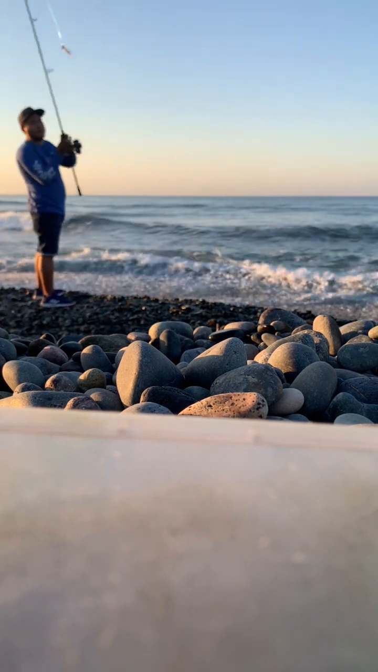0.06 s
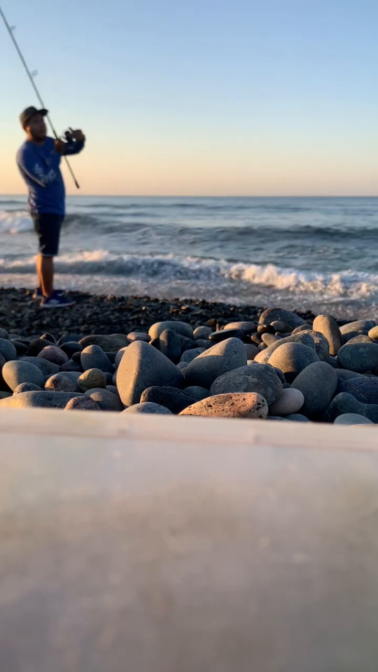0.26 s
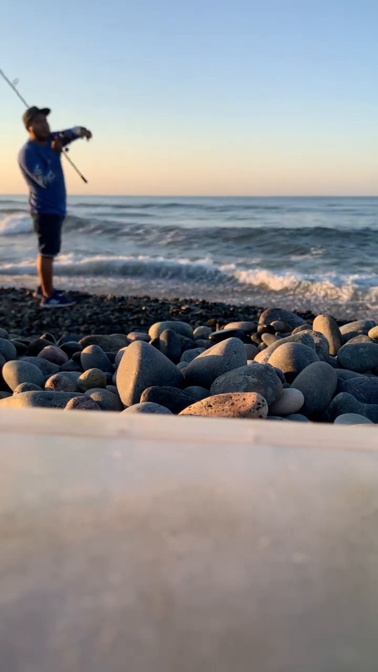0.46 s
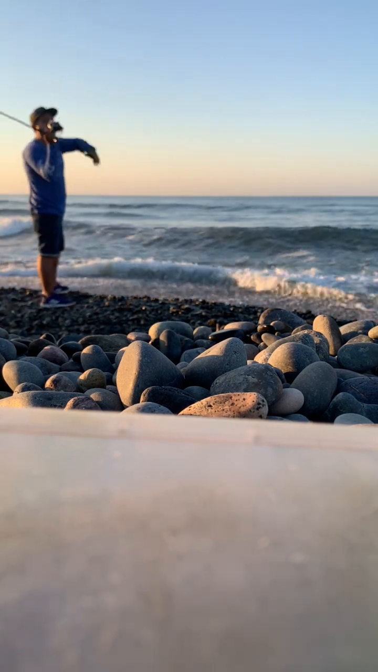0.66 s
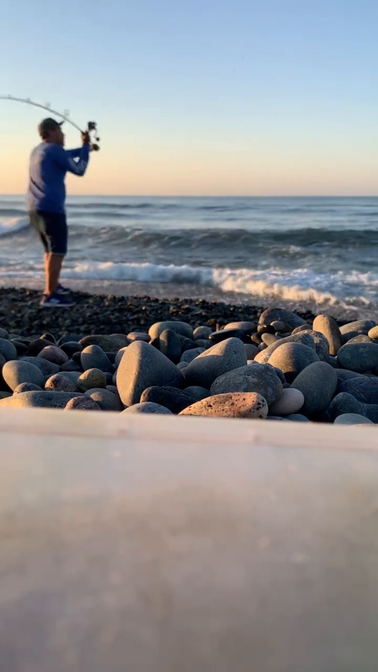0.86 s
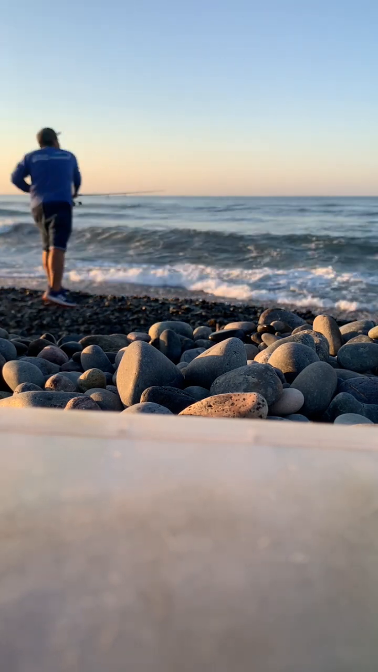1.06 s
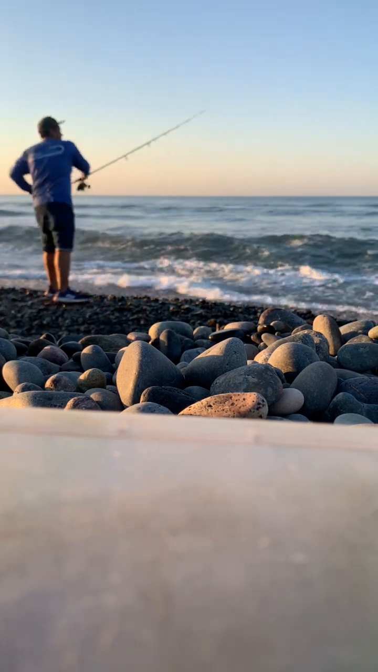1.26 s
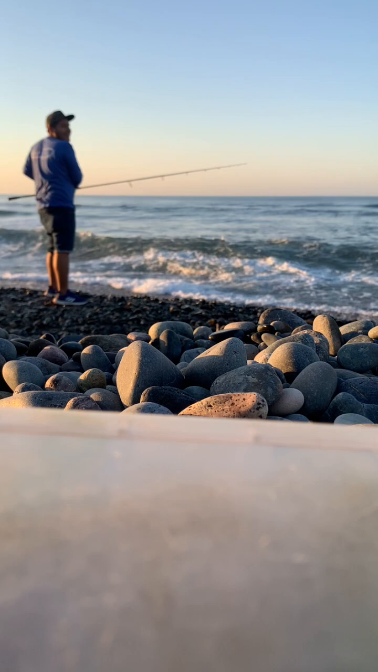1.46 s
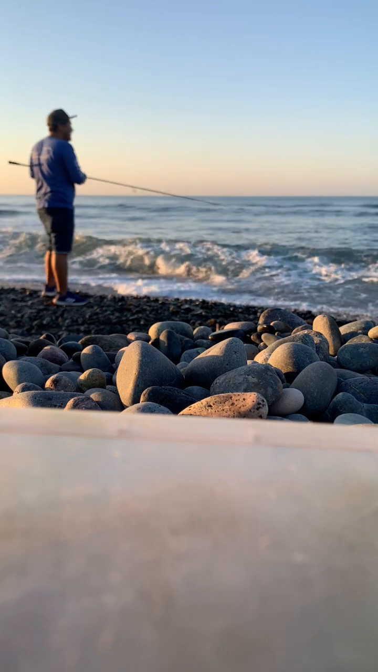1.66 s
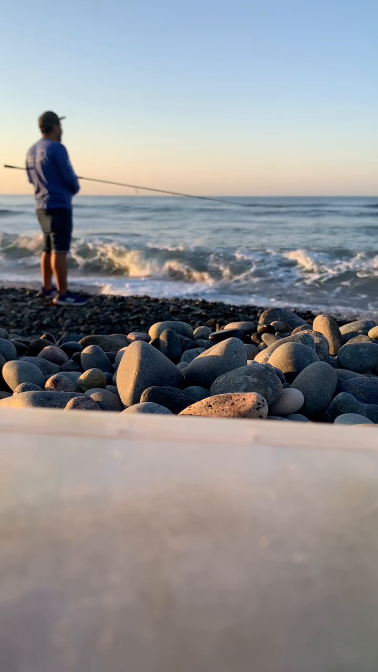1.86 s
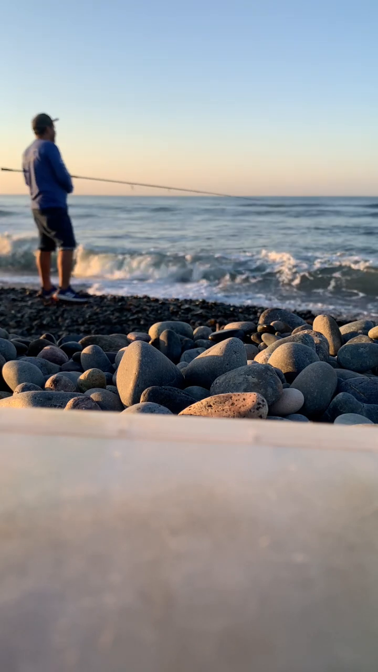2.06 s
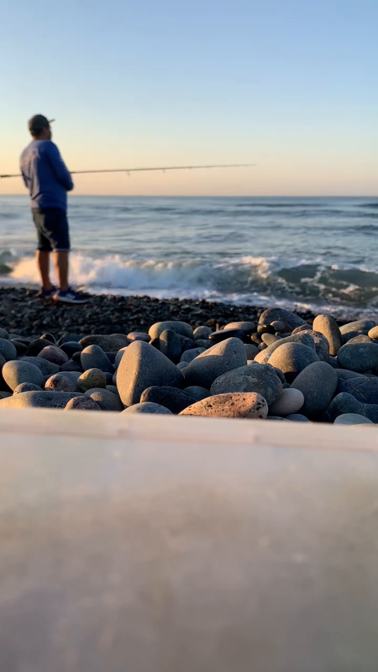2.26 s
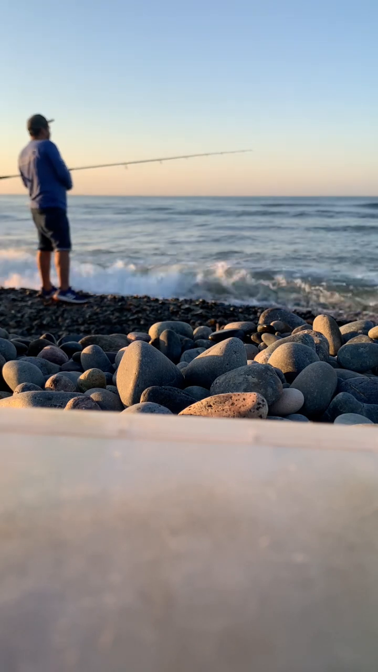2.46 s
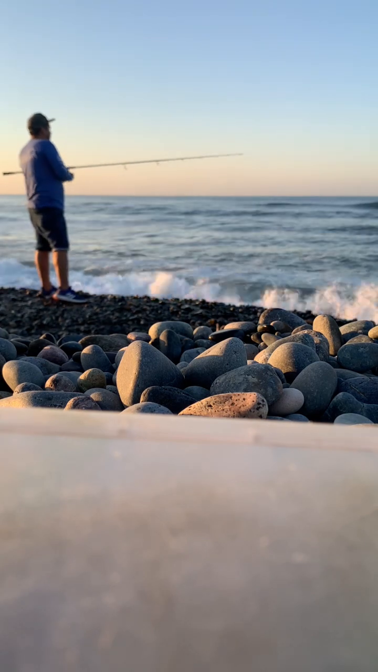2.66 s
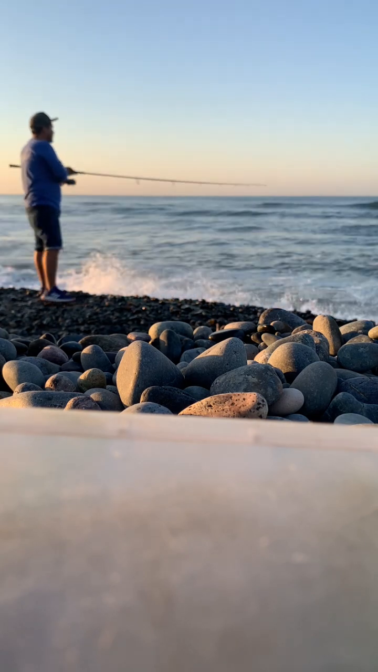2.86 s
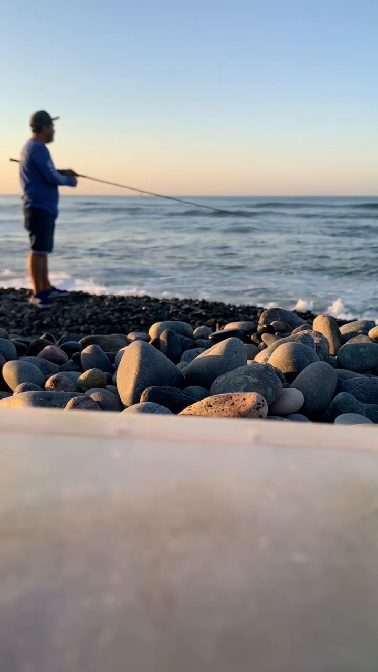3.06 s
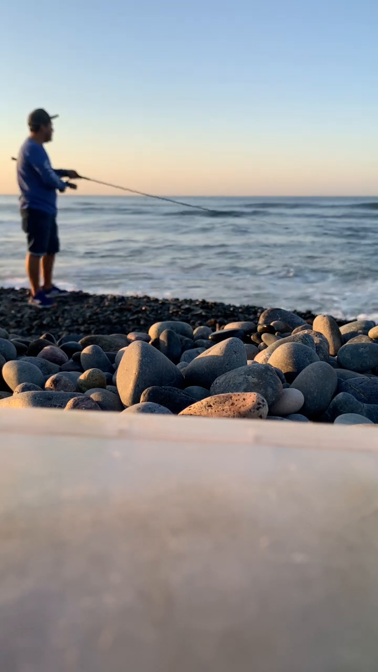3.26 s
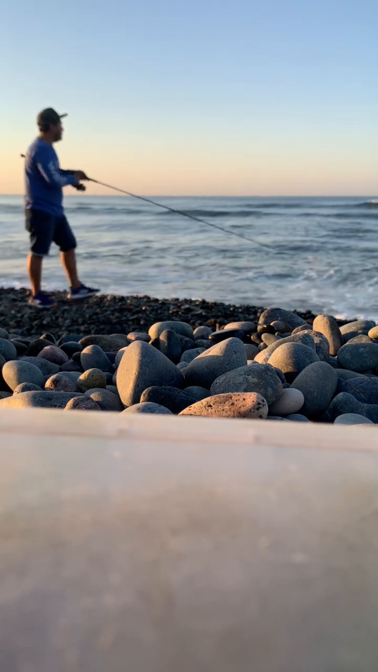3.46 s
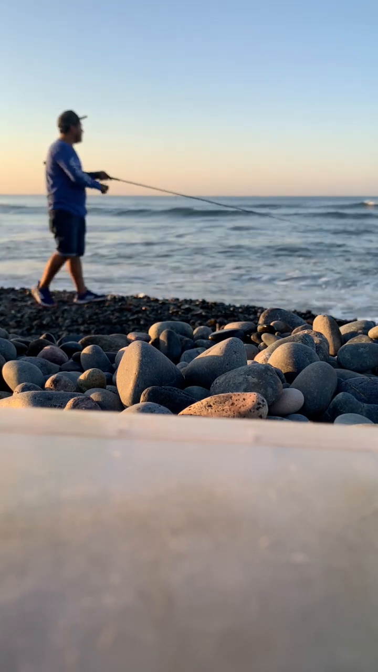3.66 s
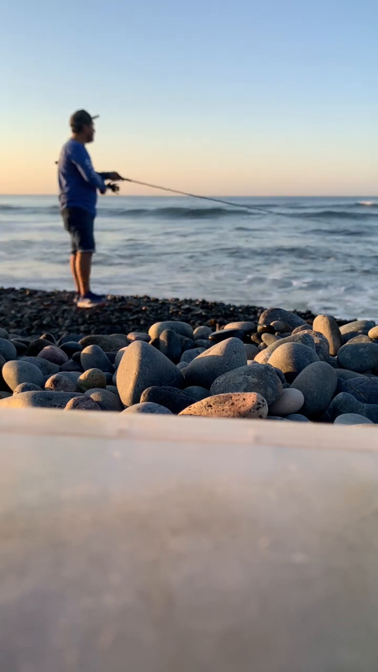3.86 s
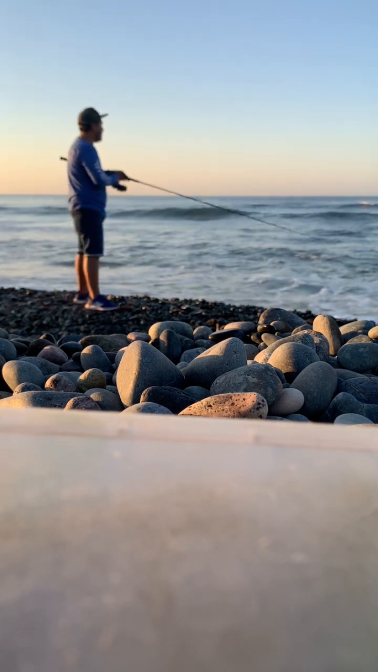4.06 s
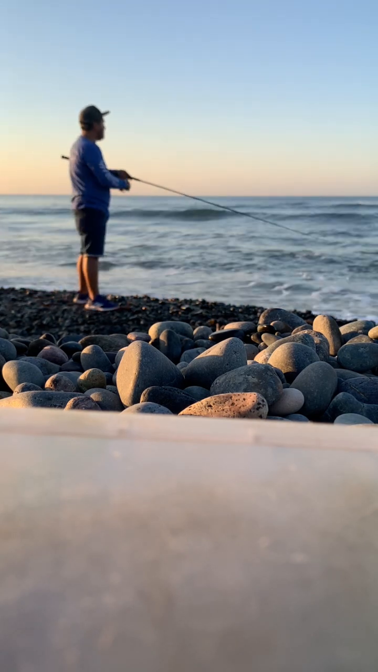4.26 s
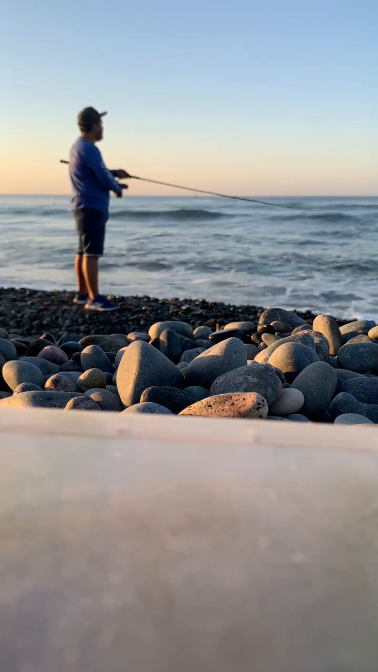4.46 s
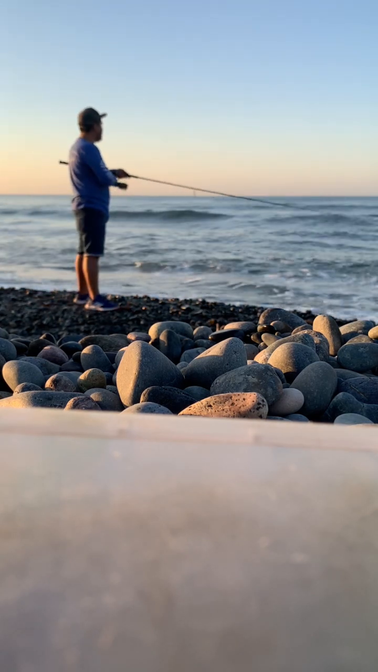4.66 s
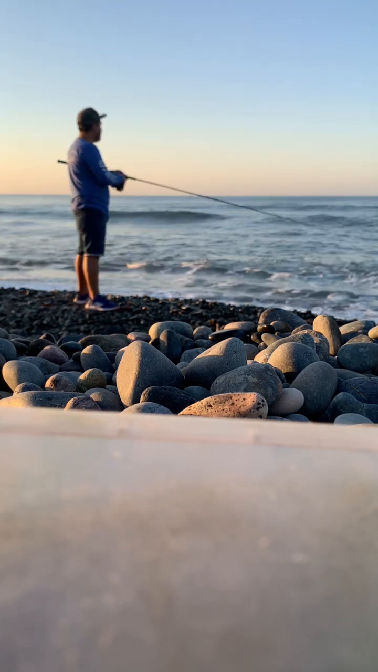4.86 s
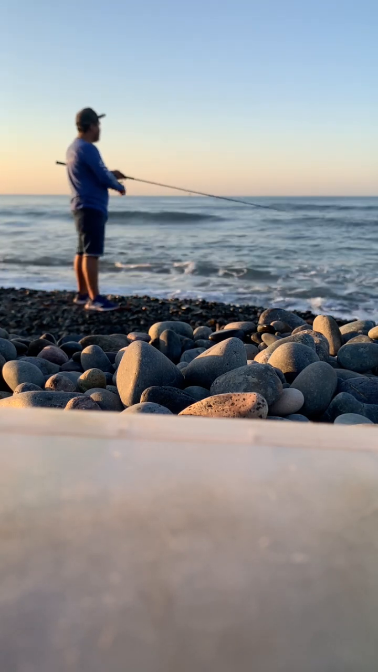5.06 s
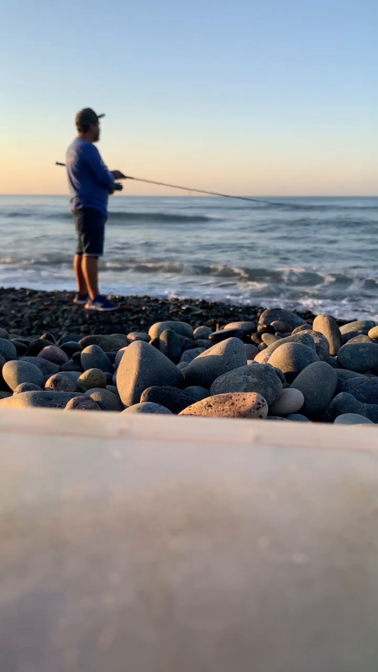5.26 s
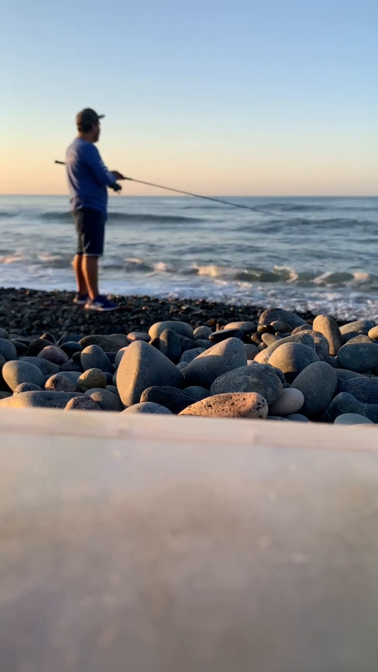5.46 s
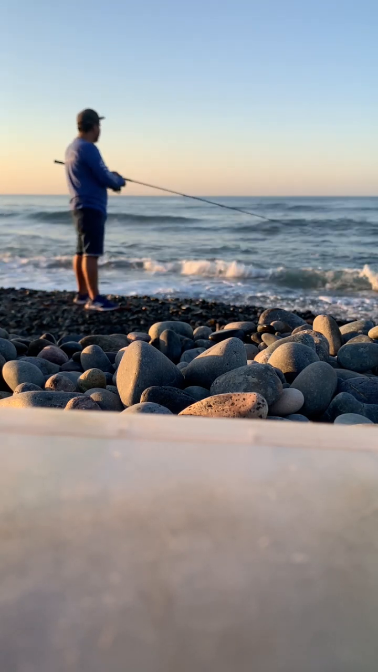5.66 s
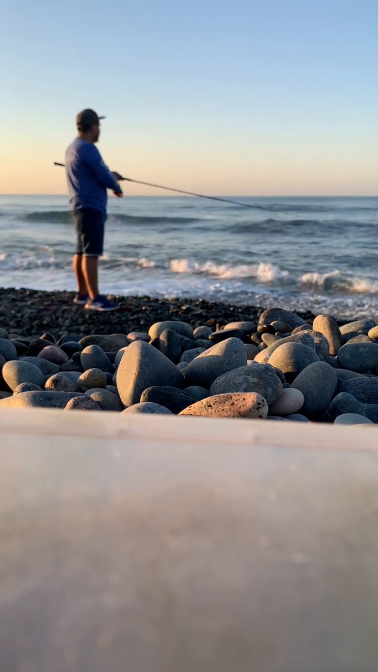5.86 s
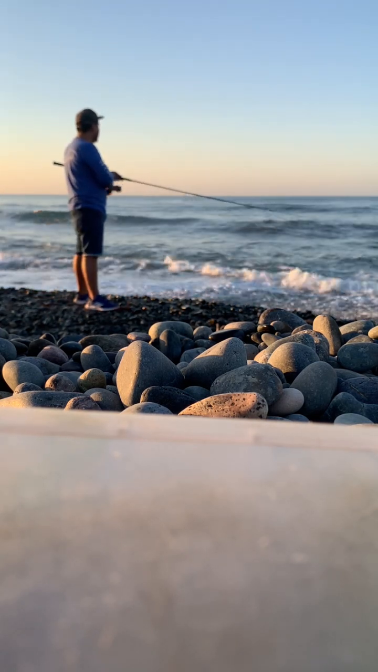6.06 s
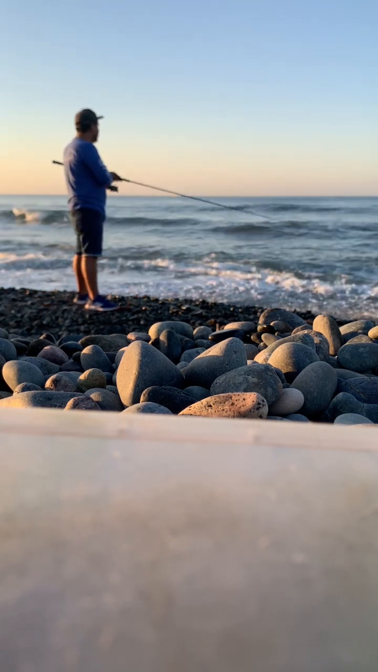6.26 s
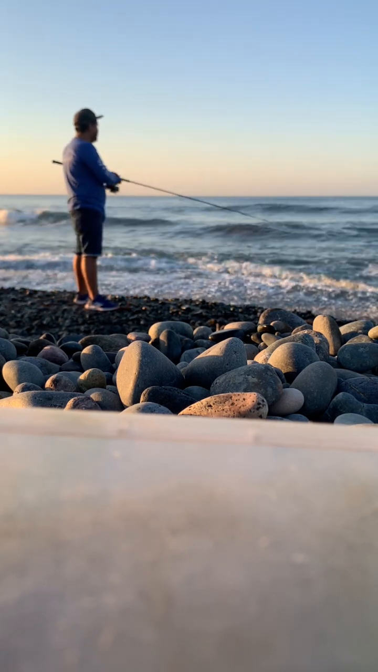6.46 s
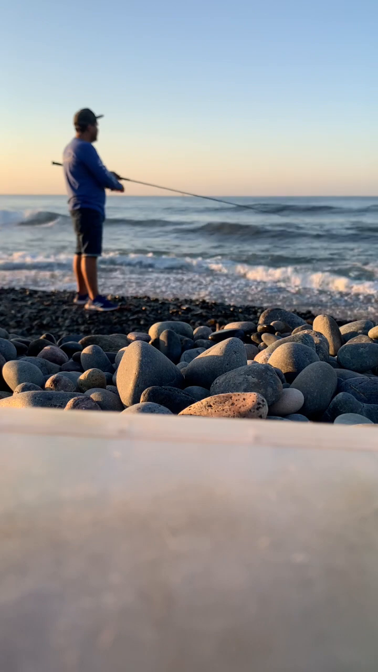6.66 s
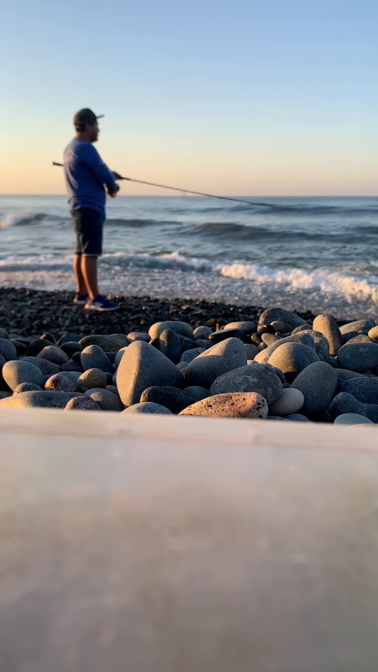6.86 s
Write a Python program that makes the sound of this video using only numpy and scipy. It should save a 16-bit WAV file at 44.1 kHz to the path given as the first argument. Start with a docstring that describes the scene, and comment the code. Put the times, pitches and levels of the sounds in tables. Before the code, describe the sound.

Ocean waves boom and fizz over a cobble beach, rattling stones, while a fishing rod whistles once and pebbles click.

```python
"""Breakers boom and roar on a cobble beach, foam fizzes up the shore and spray hisses. The surf is
countless bursting bubbles over the boom of trapped air; the running water rattles small stones and
knocks cobbles together. A few metres off, an angler whips a whistling rod through the air, tackle
ticks and pebbles click under shifting feet. All is heard by a phone lying on the stones."""
import sys
import numpy as np
from scipy import signal
from scipy.fft import rfft, irfft, next_fast_len
from scipy.io import wavfile
from scipy.ndimage import uniform_filter1d

SR = 44100
rng = np.random.default_rng(int(sys.argv[2]) if len(sys.argv) > 2 else 0)


def digitize_waveform(pressure):
    """Quantize a signal to 16-bit integers and store it at the path in sys.argv[1].

    Rows of a 2-D input are taken as channels; values are limited to [-1, 1].
    """
    field = np.atleast_2d(pressure).T
    bounded = np.clip(field, -1, 1)
    quanta = np.round(bounded * 32767).astype(np.int16)
    wavfile.write(sys.argv[1], SR, quanta)


N = 304731
FFT_SIZE = next_fast_len(N + SR // 4)
HZ = np.arange(FFT_SIZE // 2 + 1) * SR / FFT_SIZE
T = np.arange(N) / SR
CONTROL_T = T[::64]  # coarse time grid for envelopes

# how hard the waves are breaking: (time [s], boom [dB], extra roar [dB])
BREAKING = [(0, -26.5, 2.5), (.45, -25, -1.5), (1.05, -29, 0), (1.3, -31.5, -1), (1.8, -30, 2.5),
            (2.05, -21, 2), (2.3, -22.5, 1), (2.5, -22.5, 2.1), (2.8, -20.5, 1), (2.94, -21.5, -0.5),
            (3.0, -30, -1.3), (3.3, -36, 0), (3.75, -38.5, -1.5), (4.5, -36, -2), (5.2, -35.5, -0.5),
            (5.7, -31, -0.5), (6.2, -32, -0.5), (6.55, -25.5, -0.5), (6.91, -27.5, 0.5)]
# foam running up over the stones: (time [s], fizz [dB], spray [dB])
RUN_UP = [(0, -25.5, -39), (.94, -29, -40), (1.58, -33.5, -44.5), (2.25, -35.5, -45), (2.45, -33, -44),
          (2.58, -29.5, -44), (2.68, -29, -42), (2.76, -31.5, -43.5), (2.95, -35.5, -46), (3.37, -41, -64),
          (3.8, -46, -61), (4.35, -34, -75), (4.6, -31, -58), (5.04, -27, -50.5), (5.75, -24.5, -43.5),
          (6.3, -25.5, -44.5), (6.91, -26.5, -40)]


def surf(slosh_db=-0.6, flicker_db=1.4, lumps_db=0.4):
    """Two stretches of shore: bursting bubbles in third-octave bands, fed by six layers of water."""
    # layer spectra: (frequency [Hz], relative level [dB])
    boom = [(25, -64), (40, -48), (60, -33), (80, -7.5), (120, 5), (200, 6.5), (350, 2.5), (700, -33.5)]  # air trapped under a breaker
    roar = [(120, -32), (300, 0), (500, 1), (800, 2), (1100, -8.5), (2200, -17), (8000, -60)]  # breaking, tumbling water
    wash = [(500, -28), (1000, 4), (1500, 7), (1900, 1), (2600, -13), (5000, -46.5)]  # water running among the stones
    foam = [(1000, -38), (2000, -1.5), (2500, -1.5), (3200, -0.5), (4200, -6.5), (5200, -15.5),
            (7000, -13.5), (16000, -42.5)]  # fizz of the run-up
    spray = [(2000, -19), (5000, -5.5), (9000, -3.5), (16000, -10)]  # hiss on top
    far_surf = [(40, -30), (70, -11.5), (110, 5), (180, 2), (350, 1), (700, -49)]  # waves along the rest of the shore
    spectra = (boom, roar, wash, foam, spray, far_surf)
    core_hz = [(70, 250), (350, 900), (1200, 1900), (2400, 4500), (11000, 15000), (70, 250)]
    trims_db = [unit_power_db(spectrum, *core) for spectrum, core in zip(spectra, core_hz)]
    layers = list(zip(water_powers(), spectra, trims_db))
    # countless small bursts of uneven size merge into a slightly grainy rush
    sizes = undb(2.5 * np.repeat(rng.standard_normal((2, N // 8 + 1)), 8, axis=1)[:, :N])
    bubbles = rng.standard_normal((2, N)) * sizes
    bubble_spectrum = rfft(bubbles / bubbles.std(), FFT_SIZE) * FFT_SIZE / np.sqrt(2)
    out, slosh, octaves = 0, wander(4.7), np.log2(np.maximum(HZ, 1))
    for hz in 25 * 2 ** (np.arange(29) / 3):
        band = np.cos(np.pi / 2 * np.clip(3 * (octaves - np.log2(hz)), -1, 1))
        power = sum(p * undb(level_at(spectrum, hz) + trim) ** 2 for p, spectrum, trim in layers)
        drift_db = slosh_db * min(hz / 6000, 1) * slosh  # near splashes move the treble together
        drift_db += flicker_db * min(1400 / hz, 1) * wander(16)
        drift_db += lumps_db * min(1200 / hz, 1) * wander(3.585)
        envelope = audio_rate(np.sqrt(power / FFT_SIZE) * undb(drift_db))
        out = out + envelope * irfft(bubble_spectrum * band, FFT_SIZE)[:, :N]
    return out


def water_powers(roar_sends_db=(-0.097, 0, -2.36), wash_sends_db=(-12, -10, -4), far_db=-40.5):
    """Power envelopes of boom, roar, wash, foam, spray and the steady far surf."""
    boom, roar_boost = power_curves(BREAKING)
    fizz, spray = power_curves(RUN_UP)
    feeds = np.array([boom, afterwash(), fizz])  # in the order of the sends
    roar = undb(roar_sends_db) ** 2 @ feeds
    wash = undb(wash_sends_db) ** 2 @ feeds
    return boom, roar * roar_boost, wash, fizz, spray, np.full_like(boom, undb(far_db) ** 2)


def afterwash(decay_db_per_s=17):
    """Power of broken water tumbling on after the crest falls: the boom, lagging and fading slowly."""
    feedback = undb(-decay_db_per_s * CONTROL_T[1]) ** 2
    power = power_curves(BREAKING)[0]
    for _ in range(2):
        power, _ = signal.lfilter([1 - feedback], [1, -feedback], power, zi=[feedback * power[0]])
    return power


def crest_thumps(hz=111.5, width_hz=46, attack_s=0.026, release_s=0.13):
    """A crest slams down on the shore: deep rumble that swells fast and dies away."""
    # crest impacts: (time [s], level [dB])
    slams = [(2.47, -23), (2.67, -23.5), (6.3, -25), (6.55, -23)]
    envelope = np.zeros(N)
    for time, db in slams:
        span, shape = swell(time - attack_s, time, time + release_s)
        envelope[span] += undb(db) * shape
    return envelope * noise_band(hz, width_hz)


def air_pockets(flutter_db=1.5):
    """Air pockets resound hollowly in the collapsed wave and outlast the boom."""
    # pocket resonances: (centre [Hz], width [Hz], level re afterwash [dB])
    pockets = [(830, 390, -5.5), (1330, 110, -9.5)]
    resonance = sum(undb(db + flutter_db * audio_rate(wander(12))) * noise_band(hz, width)
                    for hz, width, db in pockets)
    return audio_rate(np.sqrt(afterwash())) * resonance


def stone_rattle(knocks_per_s=260, hz=1720, t60_s=0.018, cluster_db=3.0, spread_octaves=0.31):
    """Small stones rolled by the running water knock in clusters, riding the level of the fizz."""
    out, t = np.zeros(N + SR), np.arange(SR // 40) / SR
    fizz = np.sqrt(power_curves(RUN_UP)[0])
    envelope = fizz * undb(1.5 + cluster_db * wander(9))
    count = int(knocks_per_s * T[-1])
    times = rng.uniform(0, T[-1], count)
    accents_db = np.minimum(3.5 * rng.exponential(size=count), 11)
    octaves = spread_octaves * (np.abs(rng.standard_normal(count)) - .3)
    gains = np.interp(times, CONTROL_T, envelope) * undb(accents_db)
    for time, pitch, gain in zip(times, hz * 2 ** octaves, gains):
        start = int(time * SR)
        out[start:start + len(t)] += gain * ring(t, pitch, t60_s)
    return out[:N]


def cobble_knocks(detune=0.044, scatter_db=2, contact_s=0.00091):
    """The backwash knocks big stones together: dull rings, each stone a different size."""
    # cobble hits: (time [s], level [dB], brightness [dB per mode])
    hits = [(5.013, -17, 0), (5.133, -16, 0), (5.285, -15, 0), (5.521, -10, 4), (5.567, -12, -2),
            (5.911, -7, -1), (5.949, -9, 1), (6.298, -14, 1), (6.429, -13, 0), (6.58, -15, 0)]
    # resonances of a cobble: (frequency [Hz], t60 [s], level [dB])
    modes = [(720, .018, -3), (1050, .012, -7), (1700, .012, -7), (2700, .007, -11)]
    out, t = np.zeros(N), np.arange(SR // 20) / SR
    attack = np.minimum(t / contact_s, 1)
    for time, db, bright_db in hits:
        start = int(time * SR)
        pitch_jitter, level_jitter = rng.standard_normal((2, len(modes)))
        for k, (hz, t60, mode_db) in enumerate(modes):
            gain = undb(db + mode_db + bright_db * k + scatter_db * level_jitter[k])
            out[start:start + len(t)] += gain * attack * ring(t, hz * (1 + detune * pitch_jitter[k]), t60)
    return out


def rod_cast(wobble=0.012):
    """The whipped rod sheds vortices whose pitch follows its speed; the thin line swishes."""
    # vortex tones: (start [s], peak [s], end [s], start [Hz], peak [Hz], end [Hz], level [dB])
    whistles = [(.72, .744, .764, 1380, 1540, 1900, -10.5), (.746, .767, .784, 1230, 1470, 1600, -5),
                (.785, .803, .832, 1550, 1410, 1150, -7.5), (.74, .762, .773, 1850, 2360, 2520, -13),
                (.795, .81, .826, 2360, 2265, 2090, -16), (.766, .775, .784, 1070, 1010, 960, -14)]
    # line cutting the air: (time [s], level [dB])
    swish_curve = [(.70, -69), (.725, -40), (.765, -36), (.78, -52), (.80, -42), (.83, -70)]
    # colour of the swish: (centre [Hz], width [Hz], gain [dB])
    swish_bands = [(5230, 410, 7), (6800, 710, 10.5), (8200, 1000, 9.5)]
    out, unsteady = np.zeros(N), audio_rate(wander(200))
    for start, peak, end, *glide_hz, db in whistles:
        span, shape = swell(start, peak, end)
        pitch = np.interp(T[span], [start, peak, end], glide_hz) * (1 + wobble * unsteady[span])
        out[span] += undb(db) * shape * np.sin(2 * np.pi * np.cumsum(pitch) / SR)
    swish = sum(undb(db) * noise_band(hz, width) for hz, width, db in swish_bands)
    times, swish_db = np.transpose(swish_curve)
    return out + swish * undb(np.interp(T, times, swish_db, -120, -120))


def clicks(detune=0.02, scatter_db=1, contact_s=0.0003, register_db=(0, -7, -13)):
    """Pebbles and tackle tick: the same brief modes, pitched a little differently on every hit."""
    # pebble and tackle hits: (time [s], level [dB], extra body [dB per register step])
    hits = [(.9955, -24, 11), (1.001, -18, 7), (2.2974, -.5, -4), (2.3624, -23, 10), (3.0084, -33, 0),
            (3.314, -26, 0), (3.66, -43, 17), (3.675, -19, 0), (3.672, -46, 16), (3.683, -16, 3),
            (3.6954, -26, 6), (3.7064, -33, 4), (4.333, -33, 0), (4.4647, -16, 0), (4.4687, -20, 0),
            (4.4937, -24, 0), (5.2734, -15, 0), (5.3009, -24, 0), (6.298, -10.5, 0)]
    # resonances of small hard things: (frequency [Hz], t60 [s], register [0 high, 1 middle, 2 low])
    modes = [(15200, .003, 0), (13600, .0035, 0), (11600, .003, 0), (9800, .004, 1), (7600, .006, 1),
             (5800, .004, 1), (4550, .01, 2), (2300, .006, 2)]
    out, t = np.zeros(N), np.arange(SR // 40) / SR
    attack = np.minimum(t / contact_s, 1)
    for time, db, body_db in hits:
        start = int(time * SR)
        pitch_jitter, level_jitter = rng.standard_normal((2, len(modes)))
        for k, (hz, t60, register) in enumerate(modes):
            gain = undb(db + register_db[register] + body_db * register + scatter_db * level_jitter[k])
            pitch = hz * (1 + detune * pitch_jitter[k])
            out[start:start + len(t)] += gain * attack * ring(t, pitch, t60)
    return out


def scrapes(hz=8200, width_hz=12000, roughness_db=2):
    """Line zips out and soles grind on grit: short uneven bursts of broad hiss."""
    # zips and scuffs: (start [s], peak [s], end [s], level [dB])
    strokes = [(0.986, 0.997, 1.022, -20), (2.365, 2.385, 2.42, -27), (3.572, 3.572, 3.61, -39),
               (3.65, 3.68, 3.69, -34), (4.043, 4.048, 4.09, -40), (4.14, 4.15, 4.165, -44),
               (4.323, 4.335, 4.345, -40), (4.451, 4.468, 4.485, -37)]
    out = np.zeros(N)
    for start, peak, end, db in strokes:
        span, shape = swell(start, peak, end)
        noise = rng.standard_normal(SR // 10)[:len(span)]
        bins_hz = np.fft.rfftfreq(len(span), 1 / SR)
        grit = irfft(rfft(noise) * bell(bins_hz, hz, width_hz), len(span))
        out[span] += undb(db) * shape * grit / grit.std()
    return out * undb(roughness_db * audio_rate(wander(250)))


def undb(db):
    """Gain of a level in dB."""
    return 10 ** (np.asarray(db) / 20)


def level_at(spectrum, hz):
    """Read (frequency [Hz], level [dB]) rows on a log-frequency axis."""
    points_hz, db = np.transpose(spectrum)
    return np.interp(np.log(np.maximum(hz, 1)), np.log(points_hz), db)


def unit_power_db(spectrum, low_hz, high_hz):
    """Trim that gives a spectrum power 1 between two frequencies."""
    gains = undb(level_at(spectrum, HZ[(HZ > low_hz) & (HZ < high_hz)]))
    return -10 * np.log10(np.sum(gains ** 2))


def power_curves(table):
    """Power envelope of each dB column, on the control grid."""
    times, *columns = np.transpose(table)
    return [undb(np.interp(CONTROL_T, times, db)) ** 2 for db in columns]


def audio_rate(control):
    """Stretch a control curve to one value a sample."""
    return np.interp(T, CONTROL_T, control)


def wander(rate_hz):
    """Random control curve of spread 1: steps held about 1 / rate_hz, smoothed twice."""
    hold = max(int(len(CONTROL_T) / T[-1] / rate_hz), 1)
    steps = np.repeat(rng.standard_normal(len(CONTROL_T) // hold + 1), hold)
    smooth = uniform_filter1d(uniform_filter1d(steps, hold), hold)[:len(CONTROL_T)]
    return smooth / smooth.std()


def swell(start_s, peak_s, end_s):
    """Sample indices of an event and its smooth rise and fall."""
    span = np.arange(int(start_s * SR), int(end_s * SR))
    return span, np.sin(np.pi / 2 * np.interp(T[span], [start_s, peak_s, end_s], [0, 1, 0]))


def ring(t, hz, t60_s):
    """One struck mode: a decaying sine."""
    return np.exp(-np.log(1000) * t / t60_s) * np.sin(2 * np.pi * hz * t)


def bell(hz, centre_hz, width_hz):
    """Gain of a bell-shaped band."""
    return np.exp(-2 * ((hz - centre_hz) / width_hz) ** 2)


def equalize(x, gain):
    """Filter by a gain for every frequency."""
    return irfft(rfft(x, FFT_SIZE) * gain, FFT_SIZE)[..., :N]


def noise_band(hz, width_hz):
    """Noise of rms 1 in one bell-shaped band."""
    noise = equalize(rng.standard_normal(N), bell(HZ, hz, width_hz))
    return noise / noise.std()


def scene():
    """Both channels share one mix; the right is phase-shifted and blended with surf of its own."""
    # left/right likeness and phase, with a compressed-audio sheen: the channels are exactly opposite
    # near 9-10 kHz and nearly identical at 12.5-14.5 kHz
    # (frequency [Hz], likeness [0-1], right phase lead [rad], left minus right [dB])
    channel_relation = [(60, .995, -.03, .7), (200, .995, 0, 2), (500, .96, .43, 3.6),
                        (900, .91, 1.12, 1.1), (1200, .84, 2.1, -.3), (1700, .55, 1.65, -5.3),
                        (2050, .74, 3.2, -2.5), (2300, .42, 4.77, -2), (2800, .8, 5.72, -1.5),
                        (3200, .92, 6.06, -.8), (4000, .81, 5.55, -2.1), (4600, .72, 5.51, -2.2),
                        (5200, .58, 4.89, -4.2), (6000, .68, 4.62, -1.2), (6700, .73, 5.18, .5),
                        (8000, .66, 4.32, .3), (8450, .88, 3.39, 0), (8800, 1, np.pi, 0),
                        (10250, 1, np.pi, 0), (10700, .66, 2.74, .5), (11400, .57, 1.6, 0),
                        (12250, .66, .6, .3), (12450, .998, 0, 0), (14500, .998, 0, 0),
                        (15600, .85, -.5, 0)]
    shared, own_surf = surf()
    shared = shared + rod_cast() + clicks() + scrapes()
    shared = shared + crest_thumps() + cobble_knocks() + stone_rattle() + air_pockets()
    hz, *columns = np.transpose(channel_relation)
    likeness, lead, balance_db = (np.interp(HZ, hz, column) for column in columns)
    pan = undb(balance_db / 2)
    right = equalize(shared, likeness * np.exp(1j * lead) / pan)
    right += equalize(own_surf, np.sqrt(1 - likeness ** 2) / pan)
    return np.array([equalize(shared, pan), right])


def record(dry):
    """The microphone drops the deepest bass and rounds the loudest peaks; the phone cuts the top."""
    low_cut = signal.butter(2, 45, "highpass", fs=SR, output="sos")
    high_cut = signal.ellip(10, .2, 80, 15700, fs=SR, output="sos")
    rounded = np.tanh(0.52 * signal.sosfilt(low_cut, dry)) / 0.6
    return signal.sosfilt(high_cut, rounded)


dry = scene()
out = record(dry)
digitize_waveform(out)
```